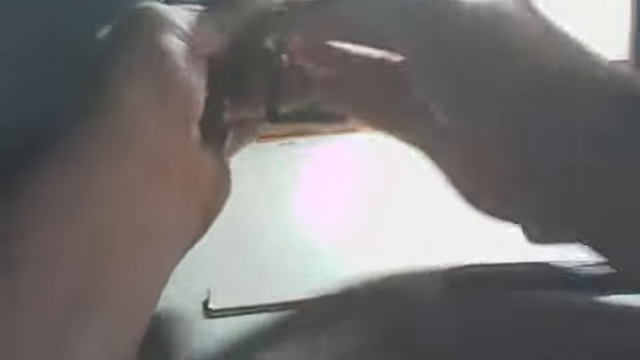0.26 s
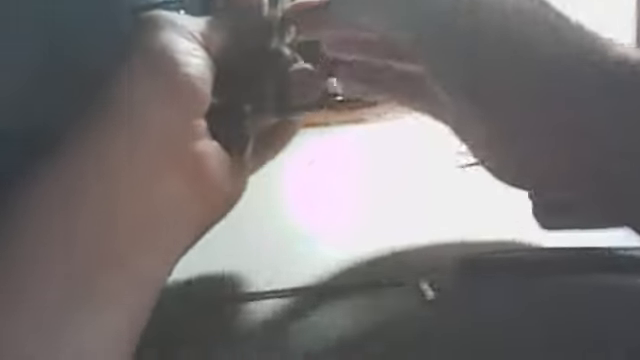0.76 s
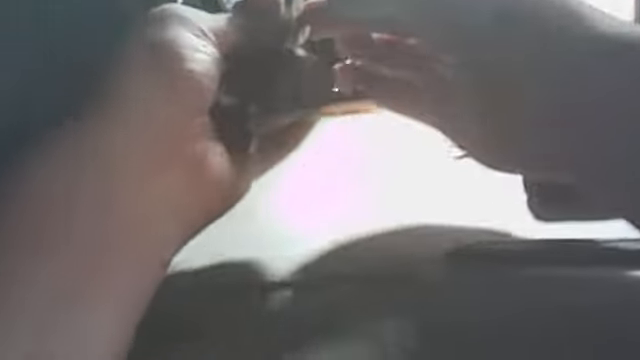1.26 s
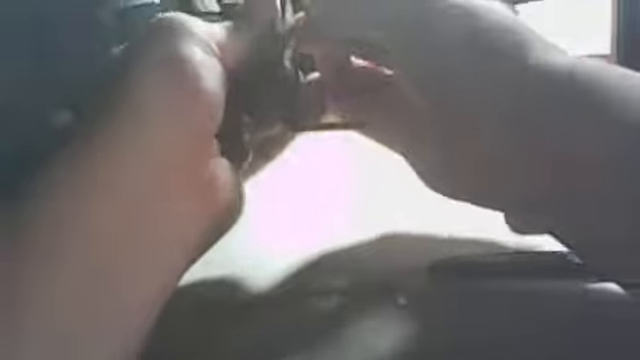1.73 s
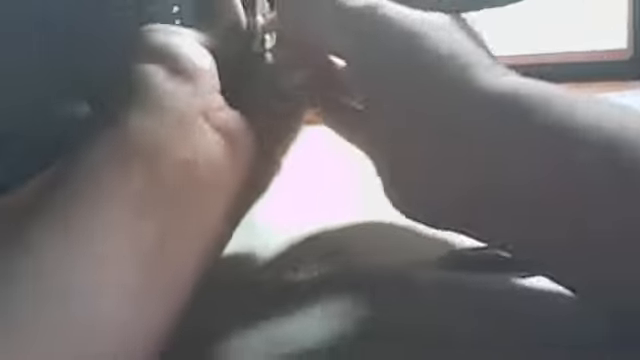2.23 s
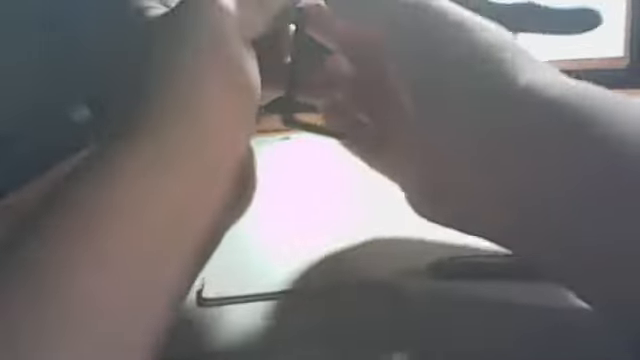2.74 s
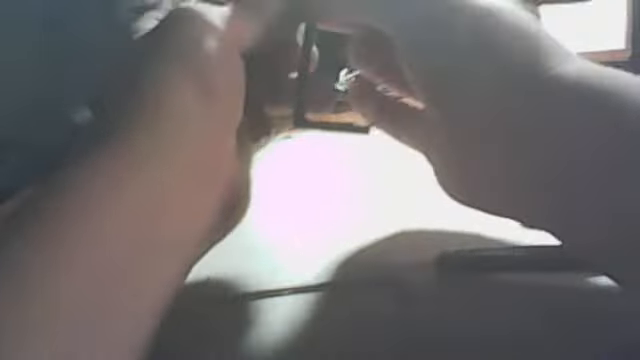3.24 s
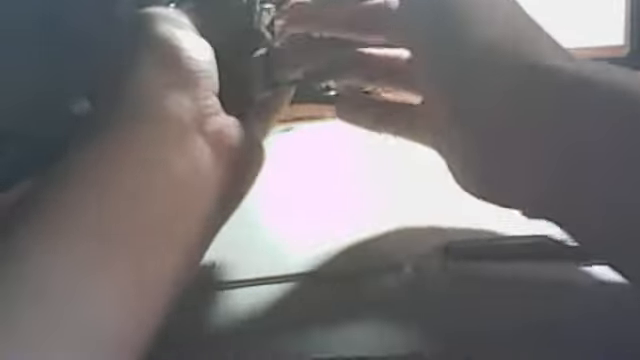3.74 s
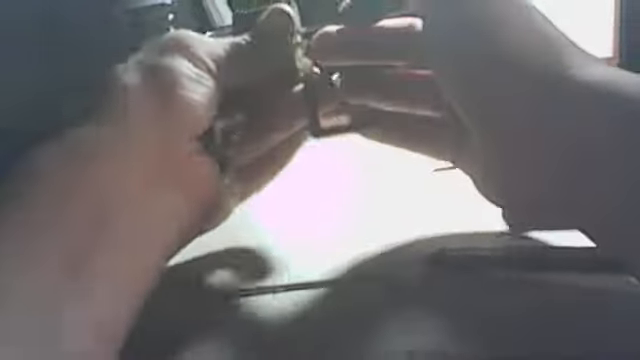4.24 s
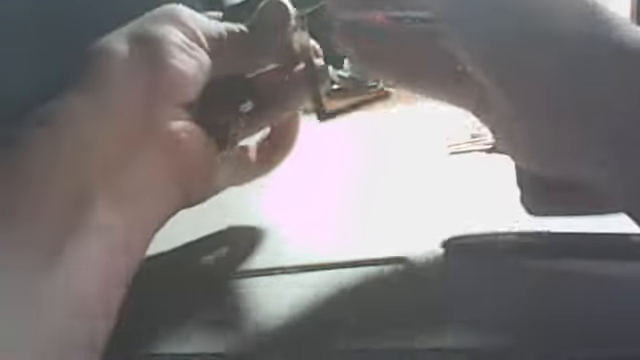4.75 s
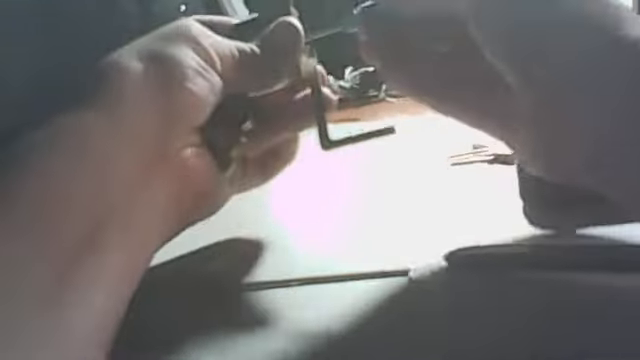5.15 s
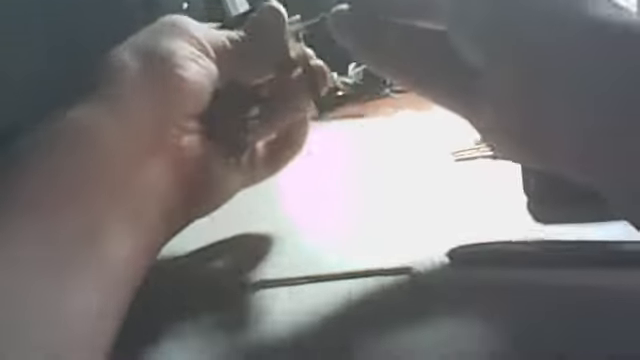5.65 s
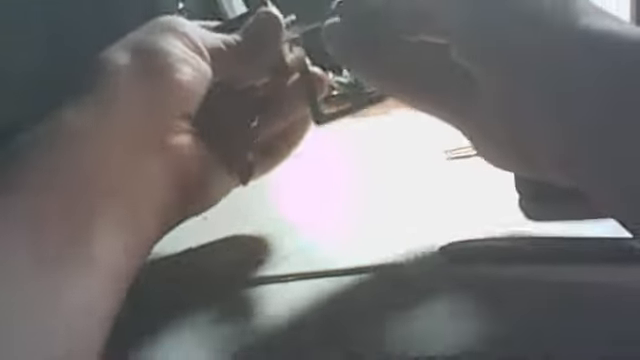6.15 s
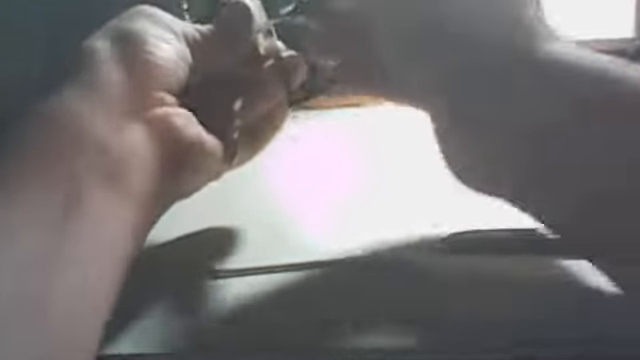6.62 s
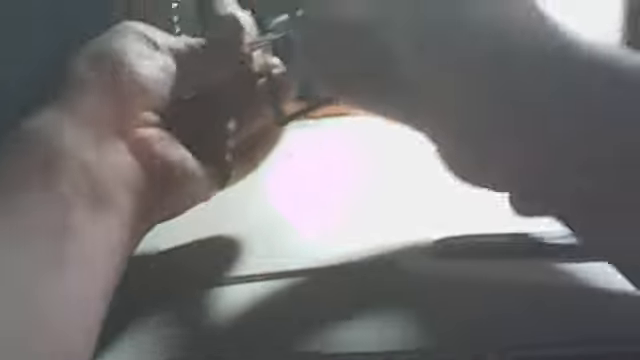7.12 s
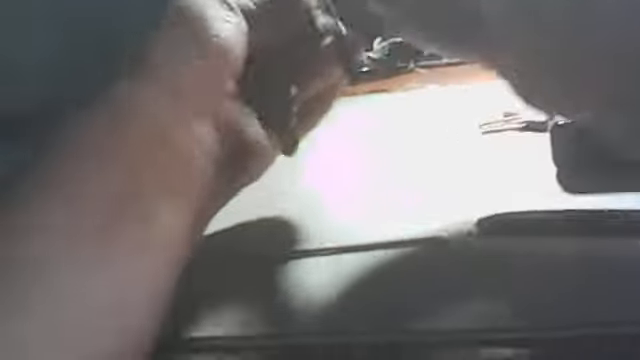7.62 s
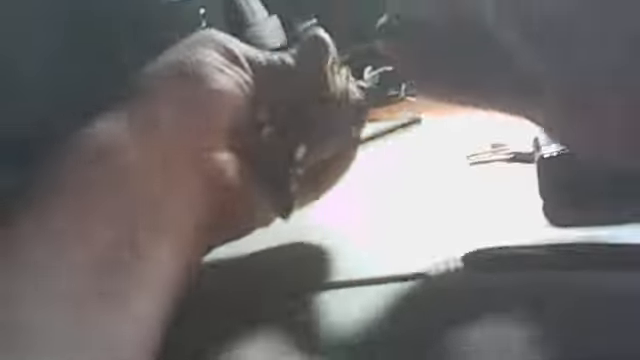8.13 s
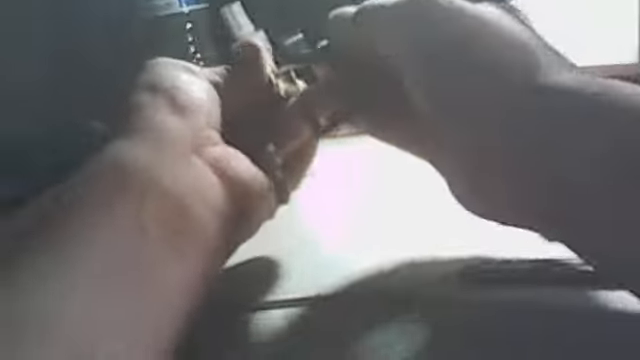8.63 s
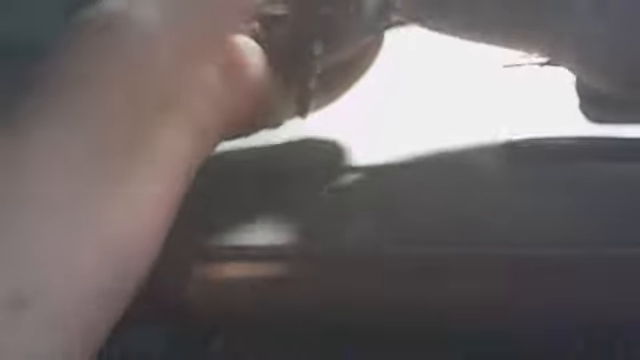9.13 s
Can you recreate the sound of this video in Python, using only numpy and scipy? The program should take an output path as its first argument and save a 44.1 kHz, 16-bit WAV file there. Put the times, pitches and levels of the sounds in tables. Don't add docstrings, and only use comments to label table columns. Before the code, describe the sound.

Very close to a small microphone, thin steel tools click inside a small lock held in the hand. A few sharp ticks open, then sparse light taps; midway a soft desk thud and rubbing, then a louder burst of ticks, a raspy slip and tiny high pings. Scratching and dull hand knocks finish it. Small dry room, quiet fan hum and hiss.

```python
import sys
import numpy as np
from scipy import signal
from scipy.fft import rfft, irfft, next_fast_len
from scipy.io import wavfile
from scipy.ndimage import map_coordinates

SR = 44100
rng = np.random.default_rng(int(sys.argv[2]) if len(sys.argv) > 2 else 0)


def invert_db(level):
    return 10 ** (np.asarray(level, dtype=float) / 20)


def put_to_file(sound):
    columns = np.atleast_2d(sound).T
    safe = np.clip(columns, -1, 1)
    whole_steps = np.round(safe * 32767)
    wavfile.write(sys.argv[1], SR, whole_steps.astype(np.int16))


N = 413658


def unit(x):
    return x / np.sqrt(np.mean(x ** 2) + 1e-20)


def peak(x):
    return x / np.max(np.abs(x))


def along(points, hz):
    f, v = np.transpose(points)
    return np.interp(np.log(hz + 1), np.log(f + 1), v)


def wobble(rate_hz):
    knots = rng.standard_normal(int(N * rate_hz / SR) + 4)
    return map_coordinates(knots, [np.arange(N) * rate_hz / SR])


def filtered(x, response):
    size = next_fast_len(len(x) + 2048)
    return irfft(rfft(x, size) * response(np.fft.rfftfreq(size, 1 / SR)), size)[:len(x)]


def shaped_noise(spectrum):
    return unit(filtered(rng.standard_normal(N), lambda hz: invert_db(along(spectrum, hz))))


def resonances(modes):
    def response(f):
        total = 0
        for k, (hz, width_hz, db) in enumerate(modes):
            damping = 1j * f * width_hz
            total = total + (-1) ** k * invert_db(db) * damping / (hz * hz - f * f + damping)
        return total
    return response


def steep(modes):
    return lambda f: resonances(modes)(f) ** 2


def swells(moves):
    t = np.arange(N) / SR
    return sum(np.interp(t, [s - rise, s, s + fade], [0, invert_db(db), 0]) for s, rise, fade, db in moves)


def add(track, start_s, sound):
    part = track[round(start_s * SR):][:len(sound)]
    part += sound[:len(part)]


# pitch_hz [Hz], t60_s [s]
ROOM_DECAY = [(300, 0.48), (2500, 0.14), (4600, 0.12), (12000, 0.12)]
# pitch_hz [Hz], level_db [dB]
WALL_COLOUR = [(1000, -2.5), (5000, 1.5), (8000, -4), (14000, 0.5)]


def echo(sound, wet_db):
    lumps = invert_db(2.4 * rng.standard_normal(SR // 256 + 1)).repeat(64)[:SR // 4]
    hz, t, cells = signal.stft(lumps * rng.standard_normal(SR // 4), SR, nperseg=128)
    decay_db = along(WALL_COLOUR, hz)[:, None] - 60 * t / along(ROOM_DECAY, hz)[:, None]
    tail = signal.istft(cells * invert_db(decay_db), SR, nperseg=128)[1]
    first_walls_s = 0.0065
    tail *= 0.63 + 0.38 * np.clip(np.arange(len(tail)) / SR / first_walls_s, 0, 1) ** 6
    wet = invert_db(wet_db) * signal.fftconvolve(sound, tail / np.linalg.norm(tail))
    add(wet, 0, sound)
    return wet


# pitch_hz [Hz], level_db [dB per Hz]
FAN_RUSH = [(12, -40.5), (20, -11), (90, -15), (150, -6), (346, -3.5), (376, -4), (409, -4.5), (549, -6.5),
            (585, -6.5), (784, -12), (835, -11), (1030, -15), (3000, -33), (3900, -67), (6600, -120)]
# pitch_hz [Hz], level_db [dB rms]
FAN_TONES = [(199.2, -71.5), (317.6, -66), (446.8, -75), (597.5, -64.5), (662.1, -68), (829.0, -71),
             (936.7, -74), (1351, -85), (1491, -80), (1593, -83), (1637, -84.5), (1685, -83.5)]


def fan():
    out = invert_db(-53.5 + 0.7 * wobble(0.6)) * shaped_noise(FAN_RUSH)
    t = np.arange(N) / SR
    for hz, db in FAN_TONES + [(158, -70.0), (347, -70)]:
        level = invert_db(db + 5 + 2.3 * wobble(3.033))
        out += level * np.sin(2 * np.pi * hz * t + (1.23 + hz / 1500) * wobble(9))
    return out


def transformer():
    t = np.arange(N) / SR
    load_on_s, load_off_s, rise_s = 4.84, 9.1, 0.52
    load = np.clip(np.minimum(t - load_on_s, load_off_s + rise_s - t) / rise_s, 0, 1)
    idle_db, loaded_db = -70, -63.5
    level = invert_db(idle_db + (loaded_db - idle_db) * load + 1.5 * wobble(1.346))
    return level * np.sin(2 * np.pi * 119.5 * t + 0.8 * wobble(4.9))


# pitch_hz [Hz], level_db [dB per Hz]
HISS_COLOUR = [(1470, -26), (2500, -7), (2940, -6.5), (3900, -4.5), (4250, -2.5), (5310, -11.5),
               (6490, -13), (8960, -20), (11700, -13.5), (15700, -16)]


def hiss():
    return invert_db(-65.0) * shaped_noise(HISS_COLOUR)


# pitch_hz [Hz], width_hz [Hz], level_db [dB]
MIC_PORT = [(4546, 1440, 11.5), (3500, 1800, -3.5), (5650, 3500, -5.5)]
# hardest_s [s], swell_s [s], fade_s [s], level_db [dB]
KEYWAY_STROKES = [
    (2.06, .2, 0.32, -69),
    (6.97, 0.95, 0.37, -58.5),
    (8.25, 0.3, 0.22, -55.5),
    (9.38, 1.5, .1, -59),
]


def scratch():
    slips = rng.standard_normal(N) * invert_db(2.5 * wobble(300) + 2.3 * wobble(25))
    lock_body = (2700, 2200, 0.67)
    idle = invert_db(-66.5)
    return invert_db(-8) * (idle + swells(KEYWAY_STROKES)) * unit(filtered(slips, steep(MIC_PORT + [lock_body])))


# pitch_hz [Hz], width_hz [Hz], level_db [dB]
PICK_EDGE = [(6200, 770, 7.5), (7550, 1300, 9), (9000, 2550, 8), (12300, 620, -10), (13100, 3100, -3.5)]
# pitch_hz [Hz], width_hz [Hz], level_db [dB]
WRENCH_SHANK = [(1862, 450, 3.5), (990, 160, 0)]
# pitch_hz [Hz], level_db [dB]
CAPSULE_TOP = [(10500, 0), (12800, 5), (14800, 0), (16400, -18)]
# start_s [s], level_db [dB peak], body_db [dB], edge_db [dB], wrench_db [dB]
MOUTH_BLOWS = [(.0306, -11.5, -28, -9, -27.5), (.0877, -43, -18, -28, -24), (.1032, -37, -21, -31, -31),
               (.7586, -25, -18, -24, -31), (.7681, -25.5, -16, -9, -18.5), (.7722, -24, -19, -26, -22),
               (1.4289, -39, -0.5, -20, -14), (1.432, -30, -8.5, -10, -12.5), (2.1409, -36, -16, -10, -22),
               (2.296, -32.5, -16, -37, -24), (2.3082, -27, -15.5, -32, -24), (2.3174, -37, -17, -27, -33),
               (4.8988, -25.5, -13, -6, -15.5), (5.7663, -32.5, -22, 0, -26),
               (5.8371, -24.5, -25, 3.5, -46), (3.1099, -44.5, -5, -26, -24), (6.6235, -39, -13, -13, -23),
               (6.7898, -26, -20, -20, -27), (7.1434, -29.5, -15.5, -5, -24.5),
               (8.7057, -29.5, -11.5, -7, -26)]
# start_s [s], level_db [dB peak], body_db [dB], edge_db [dB], wrench_db [dB]
PLUG_BLOWS = [(.3986, -15.5, -26.5, -14, -34), (1.3702, -37.5, -23, -9, -32), (5.1478, -39, -12, -27, -22),
              (6.5922, -12.5, -26.5, -5.5, -38), (6.7737, -7.5, -18, -40, -30),
              (6.7984, -27, -25, -15, -28), (7.0723, -36, -22, -15, -29), (7.5638, -38, -16, -12, -23),
              (7.5682, -28, -13.5, -14, -27), (8.74, -32, -19, -17, -34), (9.1975, -40, -2.5, -38, -30),
              (9.207, -50, 1, -35, -30), (9.3142, -36.5, -16, -33, -27), (9.3596, -37, -10.5, -42, -20)]
# start_s [s], level_db [dB peak]
TIP_TAPS = [(.2874, -53), (.3017, -48), (.3052, -47), (.3214, -52), (.3371, -48), (.5541, -49), (.58, -52),
            (1.46, -45), (2.8277, -46), (2.8734, -42), (2.9148, -46), (3.3458, -45.5), (3.3835, -51),
            (4.0856, -46.5), (5.278, -40.5), (5.9938, -44), (6.0205, -51), (6.8818, -44.5), (7.1086, -46),
            (7.3437, -49), (7.727, -49), (8.304, -40), (8.4214, -50)]
# start_s [s], level_db [dB peak]
EDGE_GRAZES = [(.278, -46), (.5944, -51), (.6195, -45.5), (3.0513, -44.5), (3.4476, -50), (5.253, -45),
               (5.4944, -51), (5.5158, -47), (5.551, -44), (7.125, -49), (7.623, -41)]
# start_s [s], level_db [dB peak]
PLUG_NUDGES = [(.5314, -59), (1.1875, -52), (1.6062, -51), (1.6182, -48), (2.0655, -47), (2.4094, -51),
               (3.074, -50), (6.5805, -45), (6.998, -54), (7.0357, -40), (7.5445, -43.5), (8.2776, -46),
               (8.5204, -61), (9.2449, -41.5)]


def tick(level_db, body_db, edge_db, wrench_db, body_hz):
    t = np.arange(SR // 60) / SR - 0.001
    envelope = np.where(t < 0, 0.04 * np.exp(t / 0.00076), 0.079 * np.exp(-t / 0.0017))
    burst = rng.standard_normal(len(t)) * envelope
    burst[np.argmax(t >= 0)] = 1
    gripped_hz = body_hz * (1 + 0.022 * rng.standard_normal())
    sound = peak(filtered(burst, steep(MIC_PORT)))
    sound += invert_db(edge_db - 1.5) * peak(filtered(burst, steep(PICK_EDGE)))
    sound -= invert_db(body_db + 9) * peak(filtered(burst, steep([(gripped_hz, 1020, 0)])))
    sound -= invert_db(wrench_db + 6) * peak(filtered(burst, steep(WRENCH_SHANK)))
    return echo(invert_db(level_db) * sound, wet_db=-11.5)


def ticks():
    out = np.zeros(N)
    mouth_hz, deep_hz = 2780, 2420
    kinds = [  # blows, then (body, edge, wrench) dB where all of a kind share them
        (MOUTH_BLOWS, (), mouth_hz),
        (PLUG_BLOWS, (), deep_hz),
        (TIP_TAPS, (-16.5, -21, -27), mouth_hz),
        (EDGE_GRAZES, (-15.5, -6.5, -24), deep_hz),
        (PLUG_NUDGES, (-9, -23, -24), deep_hz),
    ]
    for blows, shared_db, body_hz in kinds:
        for start_s, *levels_db in blows:
            add(out, start_s, tick(*levels_db, *shared_db, body_hz))
    return filtered(out, lambda hz: invert_db(along(CAPSULE_TOP, hz)))


# start_s [s], level_db [dB peak], pitch_hz [Hz], t60_s [s]
PIN_SLIDES = [(.040, -46, 3880, 0.033), (.056, -55, 4500, .05), (5.241, -49, 3900, 0.11),
              (6.3202, -30, 4700, 0.035), (6.32, -41, 2570, 0.11), (6.324, -24, 4000, .02),
              (6.333, -28.5, 3780, 0.039), (6.341, -38, 4100, 0.28), (6.601, -29, 3600, 0.035),
              (6.015, -53, 3500, 0.11), (6.735, -46, 4300, 0.022), (6.917, -42, 4270, 0.04),
              (7.045, -51, 4300, 0.018), (8.1, -60, 4200, .3), (8.33, -50, 4200, 0.25),
              (.228, -51, 4100, .03), (7.549, -50, 2500, 0.044)]


def slides():
    out, t = np.zeros(N), np.arange(SR // 4) / SR
    for start_s, db, hz, t60 in PIN_SLIDES:
        ragged_db = 4 * rng.standard_normal(len(t) // 90 + 1).repeat(90)[:len(t)]
        slips = rng.standard_normal(len(t)) * invert_db(ragged_db)
        run = slips * invert_db(-60 * t / t60) * (1 - np.exp(-t / 0.001))
        steel = steep([(hz, 1000, 0), (1.76 * hz, 2500, -13)])
        add(out, start_s, echo(invert_db(db) * peak(filtered(run, steel)), wet_db=-8.0))
    return out


# start_s [s], level_db [dB peak], then the strength of each pin mode [dB]
PIN_PINGS = [
    (0.3344, -63, -13, -16, -16),
    (1.44, -52, -10, -25, -25),
    (3.0515, -50, -13, -22, -13),
    (5.7149, -51, -24, -21, -10),
    (5.8534, -50, -19, -13, -10),
    (6.0044, -57, -17, -14, -9),
    (6.6248, -31, -30, -25, -19),
    (6.7985, -23, -30, -20, -22),
    (7.0703, -38.5, -24, -16, -18),
    (8.305, -34, -25, -28, -16),
]
# pitch_hz [Hz], t60_s [s]
PIN_RINGING = [(8500, 0.047), (10300, 0.039), (12800, 0.044)]


def pins():
    out, t = np.zeros(N), np.arange(SR // 8) / SR
    for start_s, db, *strengths_db in PIN_PINGS:
        ring = np.zeros(len(t))
        for (hz, t60), mode_db in zip(PIN_RINGING, strengths_db):
            ring += invert_db(mode_db - 60 * t / t60) * np.sin(2 * np.pi * hz * t)
        add(out, start_s, invert_db(db) * ring * (1 - np.exp(-t / 0.00013)))
    return out


# start_s [s], level_db [dB peak], pitch_hz [Hz]
DESK_KNOCKS = [(4.921, -29, 565), (4.917, -34.5, 304), (4.932, -32.5, 164), (4.956, -39, 176),
               (5.02, -44, 170), (5.322, -39.5, 790), (5.345, -35.5, 684), (6.399, -40, 427),
               (6.401, -43.5, 1100), (6.41, -44, 258), (6.773, -37.5, 680), (9.005, -40, 603),
               (9.058, -37, 770), (9.089, -41, 729), (9.132, -46, 325), (9.196, -32.5, 990),
               (9.21, -50, 452), (9.361, -30, 527)]


def knocks():
    out, t = np.zeros(N), np.arange(SR // 6) / SR
    for start_s, db, hz in DESK_KNOCKS:
        t60 = 0.037 + 6.7 / hz
        puff = rng.standard_normal(len(t)) * invert_db(-60 * t / t60) * (1 - np.exp(-t / 0.0027))
        desk, slap = (hz, 0.34 * hz, 0), (2.24 * hz, 1.35 * hz, -14)
        thud = peak(filtered(puff, steep([desk, slap])))
        add(out, start_s, echo(invert_db(db - 3) * thud, wet_db=-9))
    return out


# pitch_hz [Hz], level_db [dB per Hz]
CLOTH_COLOUR = [(200, -30), (500, -4), (800, 6), (1200, -8), (2300, -12.5), (4500, -27), (8000, -60)]
# hardest_s [s], swell_s [s], fade_s [s], level_db [dB]
HAND_SHIFTS = [
    (5.27, 0.077, .05, -54),
    (5.35, 0.065, 0.038, -49),
    (6.41, 0.022, 0.034, -56),
    (8.2, .2, .25, -58.5),
    (9.065, 0.13, .06, -55),
    (9.17, 0.077, 0.16, -53),
    (9.38, 0.083, .05, -47.5),
]


def rustle():
    grains = rng.standard_normal(N) * invert_db(1.6 * wobble(150) + 1.5 * wobble(35))
    rub = unit(filtered(grains, lambda hz: invert_db(along(CLOTH_COLOUR, hz))))
    return rub * swells(HAND_SHIFTS)


def scene():
    steady = fan() + transformer() + hiss() + scratch() + rustle()
    steady = filtered(steady, lambda hz: hz < 15780)
    return (steady + ticks() + slides() + pins() + knocks())[None]


def top_cut(x):
    return signal.sosfilt(signal.butter(12, 16540, fs=SR, output="sos"), x)


def record(dry):
    mix = filtered(dry[0], lambda hz: hz < 16400)[None]
    return top_cut(mix)


dry = scene()
out = record(dry)
put_to_file(out)
```